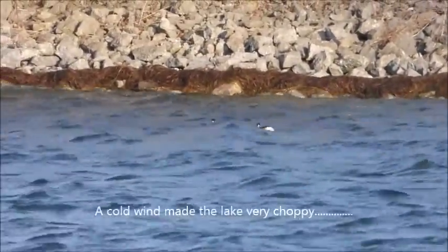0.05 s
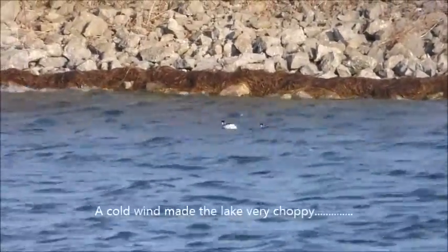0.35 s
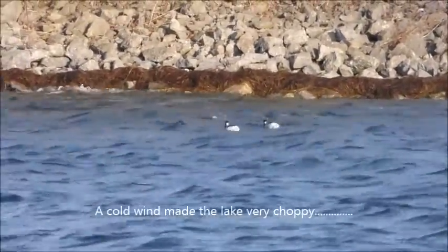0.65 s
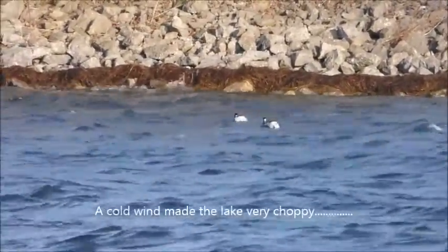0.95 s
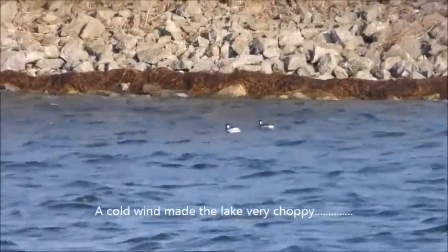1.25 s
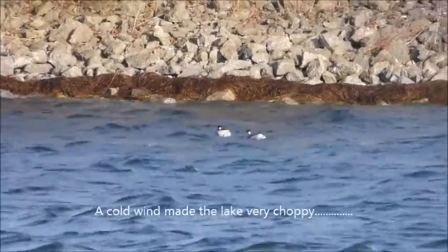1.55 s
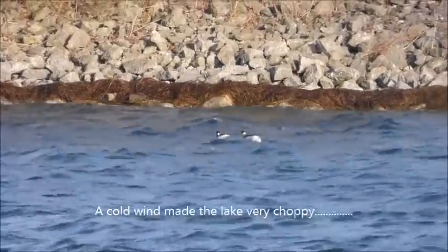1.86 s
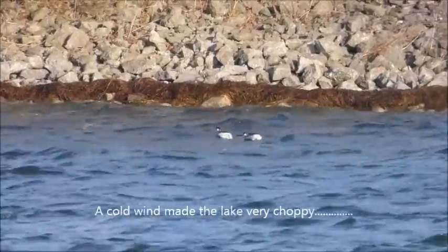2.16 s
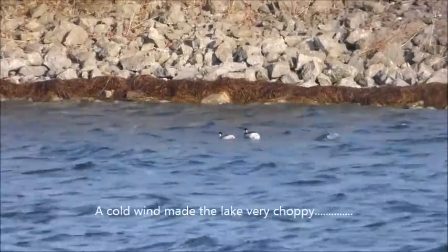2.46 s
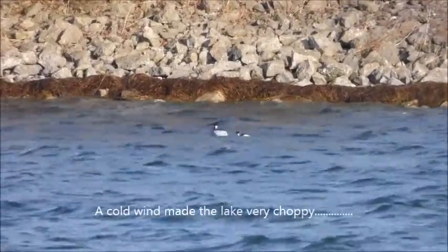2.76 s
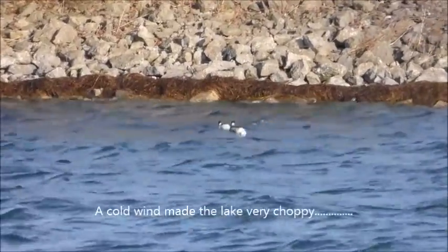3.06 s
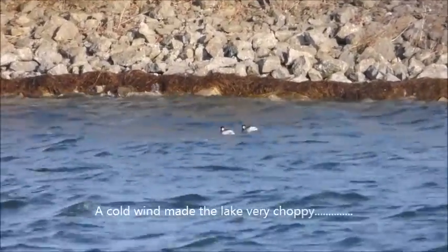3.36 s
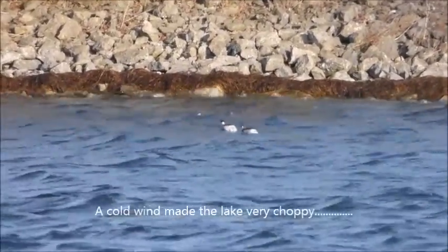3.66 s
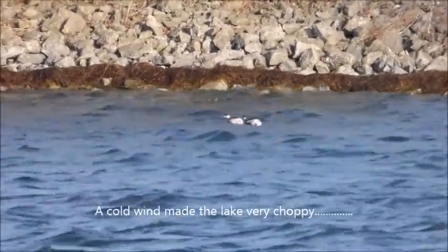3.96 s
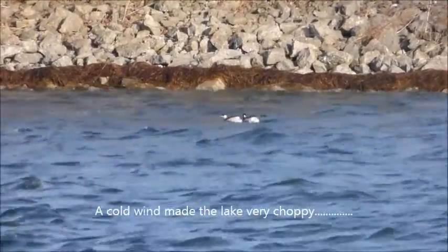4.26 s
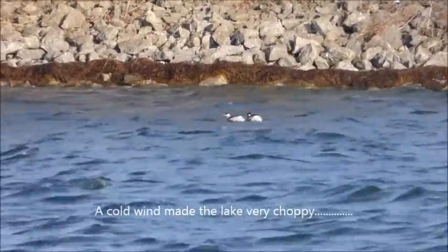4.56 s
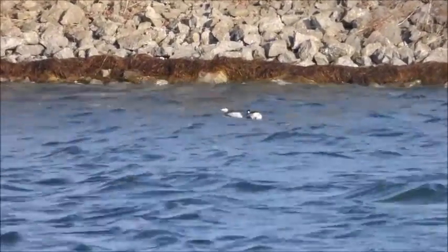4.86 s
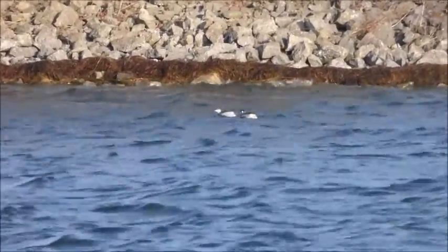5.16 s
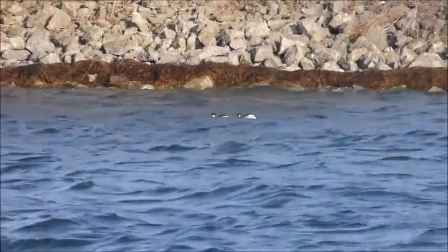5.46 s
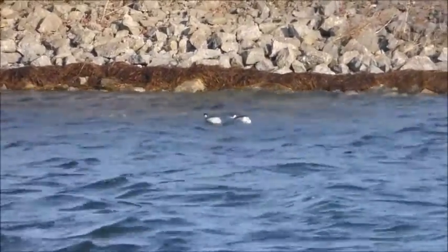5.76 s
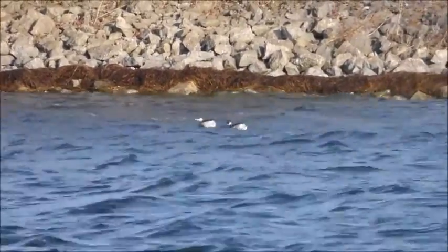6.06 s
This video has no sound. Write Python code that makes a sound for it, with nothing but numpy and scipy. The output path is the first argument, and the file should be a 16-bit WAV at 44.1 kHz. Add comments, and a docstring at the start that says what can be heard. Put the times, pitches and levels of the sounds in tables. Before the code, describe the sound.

Gusts of wind buffet the microphone with low rumbling and ragged thumps, over faintly sloshing lake water.

```python
"""Cold wind gusts buffet a camera's stereo microphone on the shore of a choppy lake.
Large eddies rumble on its two ports, smaller ones roar and rasp as the air speeds up. Compact eddies
break through as hollow thumps and ragged puffs, and evenly shed ones thrum for a moment.
Between gusts the water sloshes and its hiss swells and sinks; a few small ticks ring close by."""
import sys
import numpy as np
from scipy import signal
from scipy.fft import rfft, irfft
from scipy.io import wavfile

SR = 44100
rng = np.random.default_rng(int(sys.argv[2]) if len(sys.argv) > 2 else 0)


def log_audio(samples):
    """Write samples as a 16-bit WAV file to the path given in sys.argv[1]."""
    # one column per channel
    frames = np.atleast_2d(samples).T
    # limit to full scale, then quantise
    limited = np.clip(frames, -1, 1)
    pcm = np.round(limited * 32767).astype(np.int16)
    wavfile.write(sys.argv[1], SR, pcm)


N = 273420
TIME, BINS = np.arange(N) / SR, np.fft.rfftfreq(N, 1 / SR)
SIDES = np.array([[1], [-1]])  # left, right

# The two ports feel the same eddies a little differently. Each row: frequency in Hz, coherence (0 to 1).
PORT_LIKENESS = [(60, 1), (130, 0.98), (300, 0.99), (500, 0.97), (800, 0.96), (1700, 0.99), (2400, 0.94),
                 (2950, 0.95), (3500, 0.92), (5000, 0.94), (12000, 0.87)]
# Side wind favours one port. Each row: frequency in Hz, left over right in dB before widening.
PORT_BALANCE = [(130, -.5), (250, 1), (350, 1.5), (480, 3.5), (650, 4.5), (900, 2.5), (1200, 0.5),
                (2500, 0)]
# It also shifts their phase. Each row: frequency in Hz, left lead in radians before widening.
PORT_PHASE = [(100, 0.05), (220, -0.089), (430, -0.073), (600, -0.21), (800, -0.68), (1200, -0.55),
              (2500, -0.13), (6000, 0.21)]

# Tone colours of the water. Each row: frequency in Hz, relative level in dB.
SLOSH_COLOUR = [(100, -24.5), (300, 0.5), (560, -4.5), (750, 1), (1000, -0.5), (1400, -10.5), (2200, -27.5),
                (4000, -54)]
SPRAY_COLOUR = [(1000, 1.5), (2400, 8.5), (3300, 0.5), (4000, 3.5), (4350, 2.5), (4900, 4), (6200, 0.5),
                (8500, 1.5), (10500, -2.5), (13000, -8), (15500, -14)]
# Water hiss that swells and sinks between gusts.
# Each row: peak time in seconds, relative level in dB, rise and fall in seconds.
HISS_SWELLS = [(0.2, -75.5, .3, .1), (1.2, -72, .7, .2), (1.37, -73, .07, 0.05), (1.8, -80, .4, .3),
               (2.45, -75, 0.088, .15), (2.8, -69.5, .35, .15), (2.96, -71.5, .08, 0.082),
               (3.75, -73, .015, .025), (4.78, -78.5, 0.17, .45), (5.3, -78.5, 0.27, .2),
               (5.65, -73.5, .2, 0.23), (5.92, -73.5, .3, 0.21)]
# Small close ticks. Each row: start in seconds, level in dB, pitch in Hz, seconds to fade by 60 dB.
CLOSE_TICKS = [(0.285, -65, 10300, .02), (0.543, -59, 5970, 0.011), (1.361, -59, 5060, 0.011),
               (2.606, -52.5, 4680, .012), (2.657, -55.5, 4950, 0.011), (4.925, -47, 4350, 0.0078),
               (5.442, -57, 9100, 0.012), (5.4435, -56, 6800, 0.0083), (5.519, -56, 3780, 0.011)]

# Tone colours of the eddies, largest to smallest. Each row: frequency in Hz, relative level in dB.
RUMBLE_COLOUR = [(15, -31.5), (35, -28), (60, -17), (90, -5), (125, -2.5), (170, 1), (280, -10.5),
                 (600, -68)]
BUFFET_COLOUR = [(30, -57.5), (60, -40), (100, -15), (160, -1.5), (250, 5), (340, 0), (450, -14),
                 (700, -22), (1400, -45)]
ROAR_COLOUR = [(120, -76), (280, 3.5), (440, 3), (560, 0.16), (780, -10.5), (1050, -17), (1500, -28),
               (2400, -39.5), (5000, -66.5)]
RUSH_COLOUR = [(350, -34), (600, -2), (820, 0), (1000, -9), (1600, -22), (3000, -51.5)]
RASP_COLOUR = [(600, -13), (1100, 11), (1500, 6.5), (2200, -1), (3500, -11), (4050, -13.5), (4350, -17),
               (4900, -17), (6500, -25.5), (9000, -30.5), (15000, -87)]
GRIT_COLOUR = [(1500, -21), (3000, 6), (4000, 3), (5200, 0), (6500, -10.5), (9000, -23), (15000, -37)]
# Even eddy shedding. Each row: centre and half length in seconds, pitch in Hz, relative level in dB.
SHEDDING_THRUMS = [(2.25, 0.056, 212.2, -30.5), (5.289, 0.1, 291, -29), (5.358, 0.075, 468.4, -33),
                   (5.392, 0.044, 271.3, -29), (5.633, 0.035, 245, -34)]
# Ragged puffs. Each row: peak time in seconds, relative body and crack levels in dB, rise in seconds.
AIR_PUFFS = [(0.181, -45, -49.5, 0.0023), (0.206, -21.5, -50.5, 0.0038), (0.227, -23, -47, 0.0018),
             (0.299, -23, -48, 0.0041), (0.335, -22, -47, 0.0039), (0.37, -20, -59, 0.0034),
             (0.392, -32, -52, 0.0023), (0.404, -32, -50, 0.0035), (0.429, -39, -55, 0.0026),
             (1.002, -38, -57, 0.0017), (1.27, -24, -47, 0.0032), (1.283, -27, -48.5, .008),
             (1.391, -43, -46, .0035), (1.414, -34, -51, .002), (1.47, -29, -49, .0025),
             (1.51, -22.5, -51, 0.0043), (1.525, -30, -48.5, .003), (1.631, -37, -48, .0042),
             (1.695, -16, -57, 0.0053), (1.724, -34.5, -49, 0.0089), (1.744, -28, -46, .003),
             (1.756, -19, -46.5, .006), (1.82, -27, -46, 0.0056), (1.897, -31, -50.5, 0.0018),
             (1.96, -27, -49, 0.0061), (2.01, -36, -52.5, .002), (2.042, -26, -54, 0.0011),
             (2.081, -32, -50, 0.0023), (2.903, -23, -54.5, 0.0043), (2.923, -19.5, -62, 0.0058),
             (2.947, -18, -55, 0.0034), (3.009, -32, -45, 0.0025), (3.075, -24, -45, 0.0046),
             (3.141, -30.5, -45.5, 0.0076), (3.162, -25, -48, .002), (3.235, -20, -46, .004),
             (3.385, -33, -48.5, 0.013), (3.464, -19.5, -48.5, 0.0047), (3.493, -18, -50.5, 0.0041),
             (3.549, -35, -48, 0.0024), (3.61, -38, -44.5, 0.0052), (3.671, -23, -56, .002),
             (3.684, -21, -54, 0.0073), (3.752, -43, -43.5, .007), (3.809, -26, -49, .0049),
             (3.891, -31.5, -47.5, 0.01), (3.958, -20, -61, 0.0063), (4.022, -18, -53, 0.0051),
             (4.082, -24.5, -46.5, 0.011), (4.208, -25, -44.5, .0045), (4.326, -33, -47, 0.012),
             (4.445, -19.5, -43.5, 0.0014), (4.875, -28, -48.5, 0.0018), (4.974, -30, -53, 0.0035),
             (5.012, -34, -46, .002), (5.032, -30, -44, .0015), (5.047, -19, -51, 0.0029),
             (5.086, -25, -49.5, .008), (5.115, -32, -52, .002), (5.17, -17, -47, 0.0022),
             (5.2, -29, -51.5, .003), (5.377, -23, -48, .002), (5.401, -28, -48.5, 0.02),
             (5.621, -26, -50.5, 0.0037), (5.641, -29, -50, .0023), (5.677, -23, -51.5, 0.0033),
             (5.875, -40, -56, .002), (5.931, -23, -57, 0.002), (6.066, -19.5, -44, .0035),
             (6.092, -16.5, -55, 0.0038), (6.114, -25, -46, 0.0026), (6.159, -18, -48, .002),
             (6.175, -27, -45, 0.0068)]
# Hollow thumps. Each row: peak time in seconds, relative level in dB, pitch in Hz.
EDDY_THUMPS = [(0.228, -29, 350), (0.297, -17, 280), (0.319, -19.5, 280), (1.302, -20, 340),
               (1.338, -20.5, 340), (1.391, -16.5, 460), (1.44, -19, 277), (1.511, -19, 300),
               (1.636, -19, 276), (1.789, -16.5, 345), (1.826, -18, 345), (1.964, -23, 430),
               (2.153, -24, 317), (3.016, -16, 288), (3.148, -19, 283), (3.289, -21, 345),
               (3.329, -18, 273), (3.532, -16, 335), (3.621, -22, 274), (3.691, -21.5, 441),
               (3.77, -21, 345), (3.915, -20, 448), (4.047, -17, 321), (4.344, -22, 442), (4.386, -24, 332),
               (4.431, -18, 277), (4.446, -17, 315), (4.927, -21, 420), (5.288, -16.5, 345),
               (5.546, -23, 306), (5.616, -20.5, 340), (6.115, -21.5, 318)]
# Brief changes in the wind's level, mostly dips.
# Each row: centre and half length in seconds, level change in dB.
WIND_FADER_MOVES = [(0.309, 0.0053, -7.5), (0.55, 0.018, -1), (1.133, .012, 0), (1.212, 0.017, -1),
                    (1.675, 0.0098, 1), (2.178, .015, -2), (2.42, 0.017, -5), (2.79, 0.021, -5),
                    (3.118, 0.0071, -4.5), (3.65, .012, -2), (4.412, 0.0069, -1), (5.6, 0.0055, -2.5),
                    (6.05, 0.0042, -3), (4.526, .02, 0.5), (4.66, .025, 0), (6.145, 0.0042, -10)]
# The wind slowly swings round and strikes the ports more unequally.
# Each row: time in seconds, gain on the left-right difference in dB.
WIND_SWING = [(0, -6.5), (2.0, -1.2), (5.1, 4), (6.2, 4.5)]
# Big slow eddies. Each row: centre and half length in seconds, relative buffet and rumble levels in dB.
EDDY_SWELLS = [(0.104, 0.05, -42, -39), (0.23, 0.016, -41, -29), (0.3, 0.063, -33, -48),
               (0.333, 0.024, -42, -33.5), (0.418, 0.049, -44, -33.5), (0.687, .03, -41, -39),
               (0.796, 0.04, -38, -39), (0.897, 0.074, -37.5, -59.5), (1.072, 0.018, -35, -41),
               (1.282, 0.047, -34, -37), (1.426, .1, -41, -36.5), (1.52, 0.062, -29.5, -50),
               (1.656, .025, -39, -44), (1.768, .035, -27, -43), (1.972, 0.054, -32.5, -38),
               (2.12, 0.071, -36, -33.5), (2.243, 0.042, -35, -38), (2.35, 0.08, -59, -39),
               (2.553, 0.067, -42, -56), (2.837, 0.035, -36.5, -56), (2.936, .068, -30.5, -46),
               (3.088, 0.046, -36, -36), (3.2, .03, -43, -48), (3.337, .03, -46, -31.5),
               (3.43, 0.05, -44, -38), (3.63, 0.044, -35, -39.5), (3.808, 0.029, -32.5, -33.5),
               (4.102, 0.04, -48, -37), (4.177, 0.023, -40, -35), (4.35, 0.04, -52, -33),
               (4.454, 0.037, -33.5, -33), (4.616, 0.04, -37, -53), (4.747, .045, -36.5, -50),
               (4.943, 0.024, -33, -50), (5.084, .04, -42, -43), (5.29, 0.043, -41, -37),
               (5.397, 0.013, -32, -44), (5.523, 0.077, -35.5, -50), (5.691, 0.069, -32.5, -55),
               (5.945, 0.28, -36, -40), (6.12, 0.022, -39, -33.5)]
# Gusts. Each row: start and length in seconds, then in dB the force, its drift by the end,
# and the extra drive on the middling and on the fine turbulence.
WIND_GUSTS = [(-0.05, 0.037, 3.5, 7.5, -0.5, -28), (0.084, 0.21, -18, 13, -0.5, -2),
              (0.222, 0.18, -3.5, -4.5, -0.5, -20), (0.387, 0.12, -10.5, 4.5, -3, -2.5),
              (0.66, 0.56, -6, -4, -4, -4), (1.264, 0.24, -3, -8, 2, 2), (1.573, 0.083, -2, -3.5, -0.5, -1),
              (1.692, 0.12, 0.5, -1.5, 1.5, 0.9), (1.818, 0.26, 1.1, -5.5, -2, 0.5),
              (2.092, 0.13, -8.5, 0, -2.5, 4), (2.882, 0.16, -0.7, -0.5, 0.5, -1),
              (3.051, 0.26, 1.5, -1, -1.5, 0.5), (3.34, 0.29, 0, -4, -1.1, 3), (3.655, 0.28, -2, 1, 1, 3.5),
              (3.966, 0.49, -1.16, -2.5, 0.1, 4), (4.547, 0.061, -4.5, -2, 1.5, -7),
              (4.676, 0.32, -10, -2, 4.5, -12), (4.891, 0.34, -4, 1, 2, 2.5),
              (5.207, 0.25, -2.5, -2, 1.7, -2), (5.475, 0.26, -10, 5.5, 0, -2),
              (5.828, 0.17, -13.5, 10, -1.5, 1.5), (6.02, 0.11, -3.5, -1.5, 3.5, 5.5),
              (6.167, 0.1, 0.5, 0, 4, 2)]


def gain_of(db):
    """Decibels to a gain."""
    return np.exp(np.asarray(db) * np.log(10) / 20)


def unit_rms(x):
    """Scales a signal to rms 1."""
    return x / np.sqrt(np.mean(x ** 2) + 1e-20)


def across_bins(curve):
    """Draws a curve across the spectrum on a log-frequency axis."""
    hz, value = np.transpose(curve)
    return np.interp(np.log(BINS + 1), np.log(hz + 1), value)


def hump(peak_s, rise_s, fall_s):
    """A bell-shaped envelope that reaches 1 at peak_s."""
    return np.exp(-((TIME - peak_s) / np.where(TIME < peak_s, rise_s, fall_s)) ** 2)


def flutter(slow_hz, fast_hz):
    """Random wobble between two rates, rms 1, with its extremes softened."""
    shape = BINS / (BINS + slow_hz) / np.sqrt(BINS + slow_hz) / (1 + (BINS / fast_hz) ** 2)
    wobble = unit_rms(irfft(rfft(rng.standard_normal(N)) * shape, N))
    return unit_rms(np.tanh(wobble / 2))


def widened(pair, width):
    """Sets stereo width by scaling the difference between left and right."""
    middle = pair.mean(0)
    return middle + width * (pair - middle)


def port_noise(colour, slant=1):
    """Coloured noise as the two ports pick it up; slant 0 is a sound from straight ahead."""
    common, apart = rfft(rng.standard_normal((2, N)))
    likeness = np.clip(across_bins(PORT_LIKENESS), 0, 1)
    pair = common * np.sqrt(1 + likeness) + SIDES * apart * np.sqrt(1 - likeness)
    balance = gain_of(slant * SIDES * across_bins(PORT_BALANCE) / 2)
    phase = np.exp(.5j * slant * SIDES * across_bins(PORT_PHASE))
    roll_off = 1 / (1 + (BINS / colour[-1][0] / 2) ** 2)
    return unit_rms(irfft(pair * balance * phase * gain_of(across_bins(colour)) * roll_off, N))


def lake(floor_db=-77.5, drops_per_s=260, drop_spread_db=3.0):
    """The bed: choppy water sloshes steadily ahead; a hiss of spray and droplets swells and sinks."""
    swell_power = sum((gain_of(db) * hump(s, rise, fall)) ** 2 for s, db, rise, fall in HISS_SWELLS)
    hiss_gain = np.sqrt(gain_of(floor_db) ** 2 + swell_power)
    spray = widened(port_noise(SPRAY_COLOUR, slant=0), width=1.13)
    spray *= gain_of(0.95 * flutter(slow_hz=5, fast_hz=40))
    sizes = gain_of(drop_spread_db * np.minimum(rng.exponential(1, N), 4)) * rng.choice([-1, 1], N)
    hits = sizes * (rng.random(N) < drops_per_s / SR)
    drops = unit_rms(irfft(rfft(hits) * gain_of(across_bins(SPRAY_COLOUR)), N))
    slosh = gain_of(-49.5) * widened(port_noise(SLOSH_COLOUR, slant=0), width=0.65)
    return hiss_gain * (gain_of(5.5) * spray + gain_of(-1.5) * drops) + slosh


def ticks(spread=0.1, attack_s=0.00013):
    """Each tick strikes a cluster of seven high modes that ring for a few milliseconds."""
    out = np.zeros(N)
    t = np.arange(SR // 20) / SR
    cluster = 1 + spread * np.linspace(-1, 1, 7)[:, None]
    detunes = rng.uniform(-0.065, 0.025, (len(CLOSE_TICKS), 7, 1))
    for (s, db, hz, t60), detune in zip(CLOSE_TICKS, detunes):
        ring = unit_rms(np.sin(2 * np.pi * hz * (cluster + detune) * t).sum(0))
        start = round(s * SR)
        out[start:start + len(t)] += ring * gain_of(db - 60 * t / t60) * (1 - np.exp(-t / attack_s))
    return out


def thrums(wander_hz=45):
    """For a moment the air sheds eddies at an even pace, and the buffeting rounds into a low thrum."""
    out = np.zeros((2, N))
    for s, half_s, hz, db in SHEDDING_THRUMS:
        pace_hz = hz + wander_hz * flutter(slow_hz=23.2, fast_hz=60)
        out += gain_of(db) * hump(s, half_s, half_s) * np.sin(2 * np.pi * np.cumsum(pace_hz) / SR)
    return out * unit_rms(gain_of(3.4 * flutter(slow_hz=25, fast_hz=70)))


def grit(surge, db):
    """Only the hardest surges tear into a bright crackle: it grows with the square of their strength."""
    return gain_of(db) * unit_rms(surge ** 2) * port_noise(GRIT_COLOUR)


def puffs(spit_db=3.5):
    """A fast eddy hits the ports: a dull push with a ragged crack, gone in some milliseconds."""
    body, crack = np.zeros((2, N))
    for s, body_db, crack_db, rise_s in AIR_PUFFS:
        near = abs(TIME - s) < 10 * rise_s
        age = np.maximum((TIME[near] - s) / rise_s + 1, 0)
        envelope = age ** 2 * np.exp(2 * (1 - age))
        body[near] += gain_of(body_db) * envelope
        crack[near] += gain_of(crack_db) * envelope
    crack *= unit_rms(gain_of(spit_db * flutter(slow_hz=200, fast_hz=600)))
    push = gain_of(-7.0) * body * port_noise(ROAR_COLOUR)
    edge = gain_of(3.5) * crack * port_noise(RASP_COLOUR)
    return push + edge + grit(crack, db=-76.0)


def thumps(rise_s=0.002, fall_s=0.0018, duck_db=-2.0, left_db=1.5):
    """A compact eddy swings the pressure and displaces the churn; gives thumps and a ducking gain."""
    out, cover = np.zeros((2, N))
    for (s, db, hz), phase in zip(EDDY_THUMPS, rng.random(len(EDDY_THUMPS))):
        passing = hump(s, rise_s, fall_s)
        out += gain_of(db) * passing * np.sin(2 * np.pi * (hz * (TIME - s) + phase))
        cover += passing
    return out * gain_of(SIDES * left_db / 2), gain_of(duck_db * cover)


def wind_fader():
    """Brief changes in the wind's level, mostly dips."""
    return gain_of(sum(db * hump(s, half_s, half_s) for s, half_s, db in WIND_FADER_MOVES))


def swells():
    """Buffet and rumble envelopes of the big slow eddies that roll over the camera."""
    buffet, rumble = np.zeros((2, N))
    for s, half_s, buffet_db, rumble_db in EDDY_SWELLS:
        passing = hump(s, half_s, half_s)
        buffet += gain_of(buffet_db) * passing
        rumble += gain_of(rumble_db) * passing
    return buffet, rumble


def gusts(breeze_db=-16, attack_s=0.064, release_s=0.024):
    """Envelopes of force, middling and fine turbulence: each gust rises, drifts and dies to a breeze."""
    force, middling, fine = np.full((3, N), gain_of(breeze_db) ** 2)
    for s, length_s, db, drift_db, middling_db, fine_db in WIND_GUSTS:
        age = TIME - s
        attack = np.clip(age / attack_s + .5, 0, 1)
        release = np.exp(-np.maximum(age - length_s, 0) / release_s)
        gust = attack * release * gain_of(db + drift_db * np.clip(age / length_s, 0, 1))
        force += gust ** 2
        middling += (gust * gain_of(middling_db)) ** 2
        fine += (gust * gain_of(fine_db)) ** 2
    return np.sqrt(force), np.sqrt(middling), np.sqrt(fine)


def wind(drag_db=-8):
    """Each eddy size grows at its own rate with the gusts: the largest heave, smaller churn and spit."""
    force, middling, fine = gusts()
    buffet_swell, rumble_swell = swells()
    churn = flutter(slow_hz=11, fast_hz=171)
    spits = flutter(slow_hz=200, fast_hz=600)
    heave = flutter(slow_hz=2.8, fast_hz=12)
    rumble_gain = np.hypot(gain_of(-43.0) * force ** 0.22, rumble_swell)
    buffet_gain = np.hypot(gain_of(-34.5) * force ** 0.5, buffet_swell)
    # a big eddy also drags smaller ones along
    roar_gain = np.hypot(gain_of(-30.5) * middling ** 1.1, gain_of(drag_db) * buffet_swell)
    rasp_gain = gain_of(-48.5) * fine ** 0.73
    rumble = rumble_gain * unit_rms(gain_of(0.81 * heave)) * port_noise(RUMBLE_COLOUR)
    buffet = buffet_gain * unit_rms(gain_of(1.5 * churn)) * port_noise(BUFFET_COLOUR)
    roar = roar_gain * unit_rms(gain_of(0.78 * churn)) * port_noise(ROAR_COLOUR)
    rush = gain_of(-42) * fine ** 1.3 * unit_rms(gain_of(1.7 * churn)) * port_noise(RUSH_COLOUR)
    rasp = rasp_gain * unit_rms(gain_of(1.66 * churn + 2.1 * spits)) * port_noise(RASP_COLOUR)
    crackle = grit(fine ** 2.8 * gain_of(churn + 2.7 * spits), db=-71)
    return rumble + buffet + roar + rush + rasp + crackle


def scene():
    """The mix: wind up front, widening as it swings round, over the lake and the ticks."""
    knocks, ducking = thumps()
    width = gain_of(np.interp(TIME, *np.transpose(WIND_SWING)))
    air = widened(wind() * ducking + puffs() + knocks, width) + thrums() * ducking
    return air * wind_fader() + lake() + ticks()


def record(dry, low_cut_hz=48, notch_hz=387.6, notch_width_hz=41, high_cut_hz=15600):
    """The camera trims the deepest bass, cuts one narrow notch, then takes off the very top."""
    trimmed = signal.sosfilt(signal.butter(2, low_cut_hz, "highpass", fs=SR, output="sos"), dry)
    notched = signal.lfilter(*signal.iirnotch(notch_hz, notch_hz / notch_width_hz, SR), trimmed)
    high_cut = signal.firwin(511, high_cut_hz, window=("kaiser", 9), fs=SR)
    return signal.oaconvolve(notched, high_cut[None], "same")


dry = scene()
out = record(dry)
log_audio(out)
```